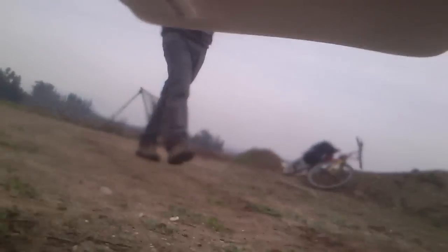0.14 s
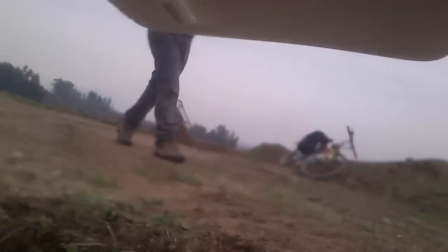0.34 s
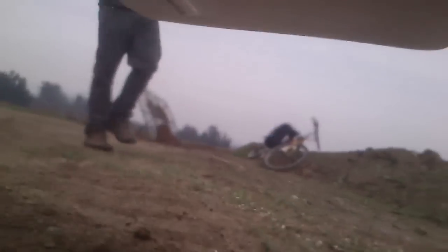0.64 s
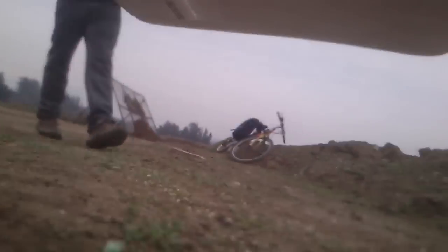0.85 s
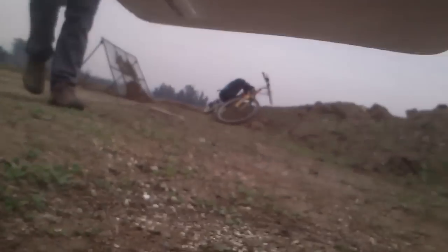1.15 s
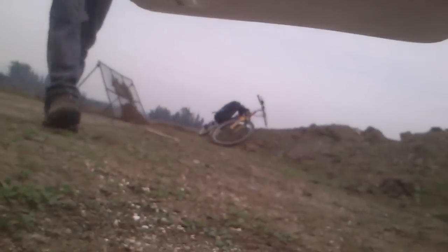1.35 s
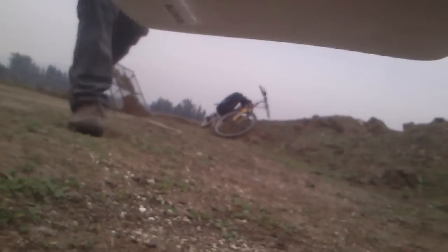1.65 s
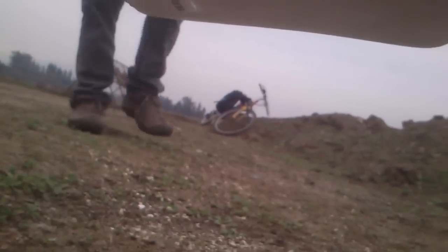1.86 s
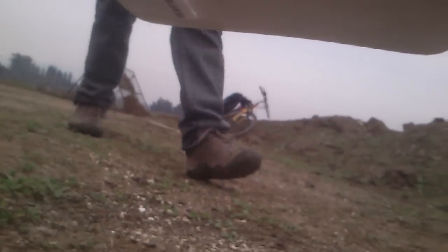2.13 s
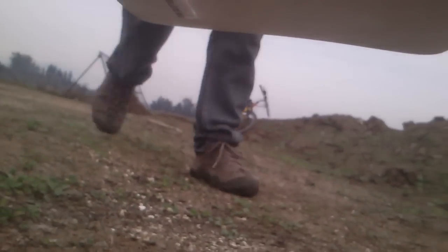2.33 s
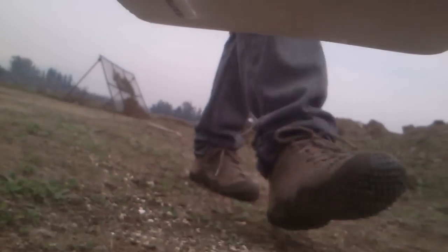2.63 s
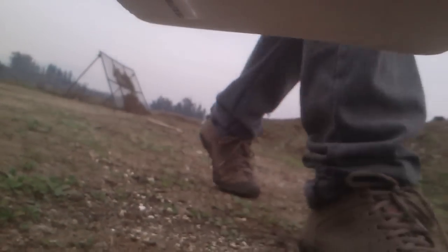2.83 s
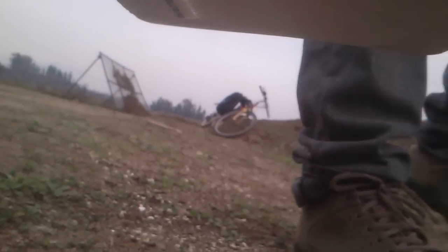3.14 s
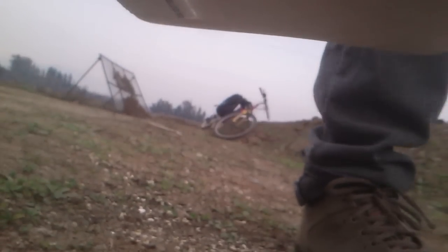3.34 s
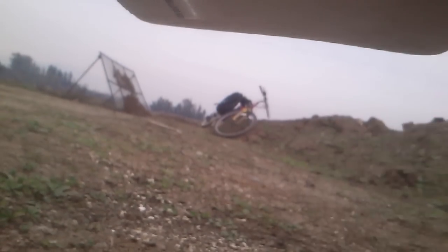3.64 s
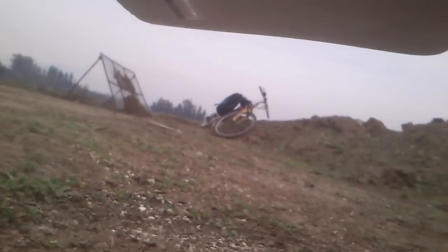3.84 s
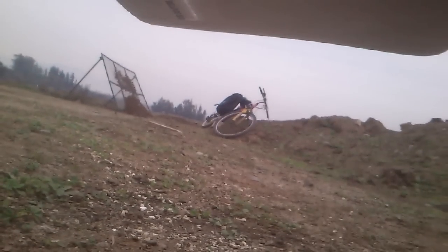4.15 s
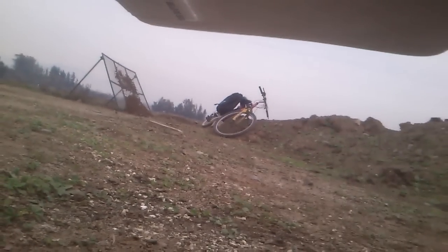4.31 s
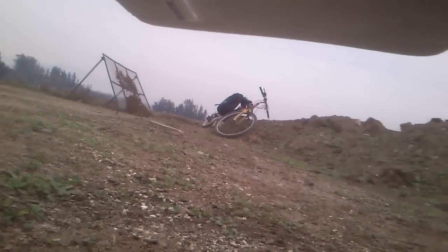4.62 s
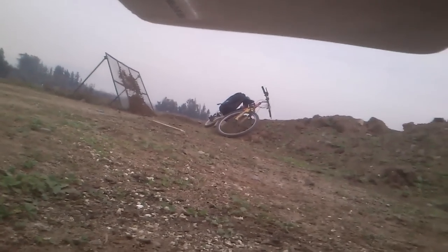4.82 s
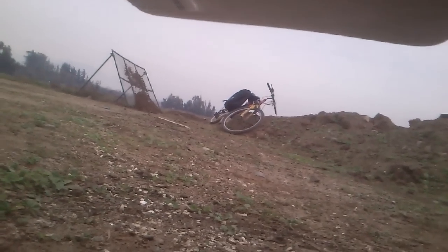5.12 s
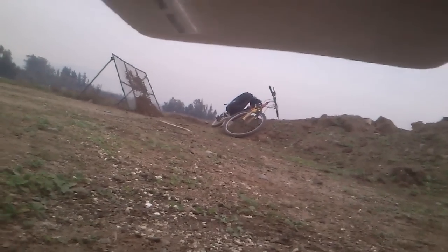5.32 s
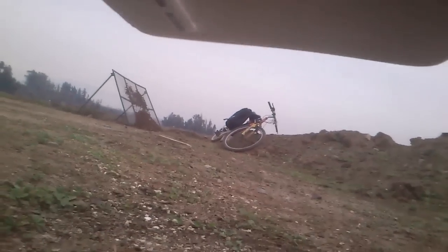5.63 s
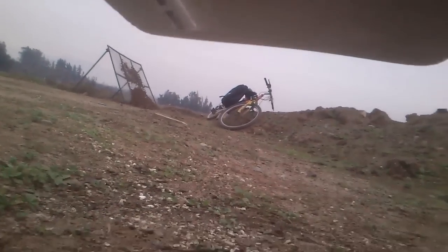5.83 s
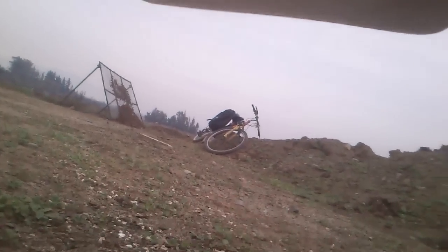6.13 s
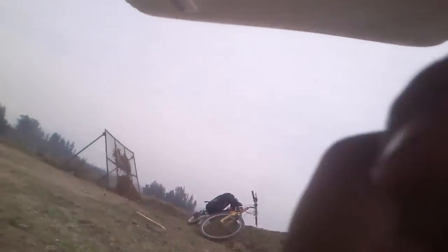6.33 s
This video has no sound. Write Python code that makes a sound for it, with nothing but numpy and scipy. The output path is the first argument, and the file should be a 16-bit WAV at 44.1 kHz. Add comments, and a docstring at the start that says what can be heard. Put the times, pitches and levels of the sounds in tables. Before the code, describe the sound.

A foam model plane scrapes and crunches to a stop on gritty ground, then faint footsteps approach and a hand knocks and rubs its body.

```python
"""A foam model glider slides to rest on a gritty hillside, heard from close under its wing.
First the belly scrapes, jolts and crunches over stones and sand (random hits through filters), while a
rough propeller whirr falls and fades. The mount then ticks and the foam skin crackles as it all settles.
Boots press and scuff the dirt (noise and tiny stone rings), then a hand knocks and rubs the foam.
A wavering low drone (sine waves), low air noise and a soft hiss lie underneath throughout."""
import sys
import numpy as np
from scipy.fft import rfft, irfft, next_fast_len
from scipy.io import wavfile
from scipy.ndimage import map_coordinates

SR = 44100
rng = np.random.default_rng(int(sys.argv[2]) if len(sys.argv) > 2 else 0)


def pcm_store(signal):
    """Save signal as 16-bit PCM."""
    levels = np.round(np.clip(np.atleast_2d(signal), -1, 1) * 32767)
    wavfile.write(sys.argv[1], SR, levels.astype(np.int16).T)


N = 285327


def amp(db):
    """Turn decibels into a gain."""
    return 10 ** (np.asarray(db) / 20)


def unit(x):
    """Scale x to an average (rms) strength of 1."""
    return x / np.sqrt(np.mean(x ** 2) + 1e-20)


def curves(rows, **ends):
    """Draw straight lines between the rows: one value per sample for each column after the time."""
    s, *cols = np.transpose(rows)
    return [np.interp(np.arange(N) / SR, s, c, **ends) for c in cols]


def wobble(rate):
    """A smooth random curve through rate random points a second."""
    points = rng.standard_normal(int(N * rate / SR) + 4)
    return map_coordinates(points, [np.arange(N) * rate / SR])


def add(track, s, sound):
    """Mix a sound into a track at time s."""
    part = track[max(round(s * SR), 0):][:len(sound)]
    part += sound[:len(part)]


def fade(t, t60):
    """Dying away: 60 dB weaker after t60 seconds."""
    return np.exp(-np.log(1000) * t / t60)


def coloured(x, spectrum, modes=(), tilt=0):
    """Filter x with a broad colour, resonances on top, and a tilt in dB per octave."""
    size = 2 * next_fast_len(len(x) // 2 + SR // 32, real=True)
    hz = np.fft.rfftfreq(size, 1 / SR) + 1
    f, level = np.transpose(spectrum)
    db = np.interp(np.log(hz), np.log(f), level)
    db = db + tilt * np.log2(np.clip(hz, 200, 6500) / 1000)
    for centre, width, lift in modes:
        db = db + lift / (1 + (2 * (hz - centre) / width) ** 2)
    # folding the cepstrum makes the filter ring only after each hit, never before it
    cepstrum = irfft(np.log(amp(db)))
    cepstrum[1:size // 2] *= 2
    cepstrum[size // 2 + 1:] = 0
    return irfft(rfft(x, size) * np.exp(rfft(cepstrum)))[:len(x)]


def grains(rate, spread_db):
    """Tiny random contacts of uneven size, about rate a second, at rms 1."""
    size = amp(spread_db * np.clip(rng.standard_normal(N), -2, 2))
    hits = rng.random(N) < rate / SR
    return unit(hits * size * np.sign(rng.standard_normal(N)))


def pebbles(start, end, rate, t60, spread_db):
    """Stones strike at random moments, each with a brief ring at its own pitch; rms 1."""
    when, pitch, size = rng.random((round(rate * (end - start)), 3)).T[:, :, None]
    t = np.arange(SR // 160) / SR
    rings = amp(spread_db * size ** 2) * np.sin(2 * np.pi * pitch * SR / 4 * t) * fade(t, t60)
    at = ((start + when * (end - start)) * SR).astype(int) + np.arange(len(t))
    return unit(np.bincount(at.ravel(), rings.ravel(), N)[:N])


def scatter(start, end, level_db, rate, spread_db, tilt, tilt_spread):
    """Small contacts at uneven moments, rate a second, sized by a level curve: rows (s, dB, tilt)."""
    chance = rng.random((200, 3))  # at most 200 contacts
    times = start + (np.arange(len(chance)) + chance[:, 0]) / rate
    rows = []
    for s, (_, size, colour) in zip(times, chance):
        if s < min(end, (N - 1) / SR):
            db = level_db[int(s * SR)] + spread_db * (2 * size - 1)
            rows.append((s, db, tilt + tilt_spread * (2 * colour - 1)))
    return rows


SPOT_WIDTH_HZ, SPOT_LIFT_DB = 275, 8.5  # the resonance of the spot that a contact meets


def blows(rows, spectrum, modes, t60, chatter):
    """Each contact is a push and a dying chatter; it rings the body and one spot (random if unnamed)."""
    track, t = np.zeros(N), np.arange(SR // 12) / SR
    for s, db, tilt, *note in rows:
        force = chatter * rng.standard_normal(len(t)) * fade(t, t60)
        force[0] = 1
        spot_hz = note[0] if note else 2900 * np.exp(.25 * rng.standard_normal())
        ring = coloured(force, spectrum, [*modes, (spot_hz, SPOT_WIDTH_HZ, SPOT_LIFT_DB)], tilt)
        add(track, s, amp(db) * ring / np.abs(ring).max())
    return track


def friction(contacts, s, size, grit):
    """The force of a stroke from time s: a smooth swish mixed with a share of separate contacts."""
    rough, share = unit(contacts[round(s * SR):][:size]), np.clip(grit, 0, 1)
    return np.sqrt(share) * rough + np.sqrt(1 - share) * rng.standard_normal(len(rough))


# how hard the belly drags, until it stops: time_s, level_db
DRAG = [(0, -13.5), (.18, -19), (.34, -15.5), (.42, -19.5), (.8, -23.5), (1.0, -23.5), (1.21, -35.5),
        (1.31, -45.5), (1.44, -52)]
DRAG_REF_DB = -20  # the drag level that counts as an effort of 0 dB


def drag_level():
    """The belly's drag in dB at every sample, silent once it has stopped."""
    return curves(DRAG, right=-140)[0]


# resonances of the body and of its shell: pitch_hz, width_hz, lift_db
AIRFRAME = [(74.6, 16, 16), (146.9, 19, 9), (181.2, 11, 11.5), (277.4, 42, 10), (890, 48, 3.5),
            (1387, 84, 3), (2020, 54, 10), (2480, 220, 5.5)]
SHELL = [(874, 90, 4), (1300, 140, 3), (1800, 120, 3), (2790, 260, 5), (3290, 260, 7), (4000, 300, 4),
         (4690, 200, 4), (5100, 250, 5)]
# colours of the low shudder, the scrape and the crunching gravel: pitch_hz, level_db
RUMBLE = [(15, -31), (30, 2), (45, -1), (75, -6.5), (112, -6.5), (160, -4.5), (215, -10), (320, -30),
          (600, -81.5)]
SCRAPE = [(120, -64.5), (220, -7), (280, -4.5), (380, 1), (600, -2), (900, -2.5), (1200, -9.5), (1800, -14),
          (4000, -39), (9000, -97)]
CRUNCH = [(300, -20), (800, 0.5), (1500, -5), (2500, 2), (3400, -4.5), (4000, -4.5), (5000, -13.5),
          (5500, -12.5), (7200, -12), (8300, -22), (10000, -64), (16000, -91.5)]
RUMBLE_DB, RUMBLE_GROWS = -23.5, 0.68  # level at zero effort, and dB gained per dB of effort
CRUNCH_DB, CRUNCH_GROWS = -36.5, 1.33  # the same for the gravel
BUMPS_DB, BUMPS_HZ = 1.94, 28.2  # how far the belly rocks, and random points a second


def slide():
    """The belly drags over grit: the wings shudder, the shell roars and gravel crunches."""
    drag_db = drag_level()
    effort_db = drag_db - DRAG_REF_DB
    clumps = np.tanh(wobble(110.34))  # the ground comes in lumps
    bumps_db = BUMPS_DB * np.tanh(1.8 * wobble(BUMPS_HZ))

    shudder = unit(coloured(grains(900, spread_db=3.0), RUMBLE, AIRFRAME))
    rumble = amp(RUMBLE_DB + RUMBLE_GROWS * effort_db + bumps_db) * shudder

    grit = grains(1600, spread_db=2) * amp(2 * clumps)
    scrape = amp(drag_db - 1.0 + bumps_db) * unit(coloured(grit, SCRAPE, AIRFRAME))

    gravel = pebbles(0, DRAG[-1][0], rate=2400, t60=0.005, spread_db=11) * amp(3 * clumps)
    crunch = unit(coloured(gravel, CRUNCH, SHELL))
    crunch = amp(CRUNCH_DB + CRUNCH_GROWS * effort_db + bumps_db) * crunch
    return rumble + scrape + crunch


# the belly jolts over humps and the hull booms briefly: start_s, level_db, pitch_hz
JOLTS = [(.008, -14.5, 660), (0.109, -14, 810), (.21, -12, 846), (.313, -13.5, 304), (.372, -18.5, 860),
         (.412, -18.5, 427), (0.471, -28, 453), (.519, -16, 515), (0.554, -25, 900), (.58, -19.5, 396),
         (.68, -16.5, 760), (0.727, -19.5, 480), (.765, -34, 520), (.82, -25, 466), (.846, -21.5, 910),
         (.877, -23, 700), (0.912, -23, 350), (.942, -23, 547), (.98, -23.5, 600), (1.049, -39, 417),
         (1.09, -21.5, 435), (1.19, -31.5, 730)]
JOLT_S, JOLT_WIDTH_HZ, JOLT_LIFT_DB = 0.041, 330, 12.5


def jolts():
    """Each hump presses the belly harder for a moment and brings out one region of the hull's ring."""
    track, press = np.zeros(N), np.hanning(round(JOLT_S * SR))
    for s, db, hz in JOLTS:
        noise = rng.standard_normal(len(press))
        force = np.pad(press * noise, (0, SR // 20))  # room for the ring to die away
        boom = coloured(force, SCRAPE, [*AIRFRAME, (hz, JOLT_WIDTH_HZ, JOLT_LIFT_DB)])
        add(track, s, amp(db) * boom * np.linalg.norm(press) / np.linalg.norm(boom))
    return track


# larger stones under the belly, relative levels: start_s, level_db, tilt_db_per_octave
STONES = [(.011, -11, -3), (.029, -23.5, 4), (.044, -10.5, -10), (.096, -6, -4.5), (.1202, -2.5, -1.5),
          (.156, -6.5, -1), (.171, -15, 4), (.2205, -10.5, 11), (.2285, -12.5, 2), (.2344, -6.5, 1),
          (.249, -4, 1), (.263, -11, 5), (.308, -12, 2), (.326, -25, 8), (.339, -17, 7), (.359, -12, 13.5),
          (.368, -6.5, 3.5), (.434, -13, 3), (.448, -13, 4), (.462, -17, 6), (.5335, -6, 3),
          (.546, -10.5, -2), (.552, -12, 10), (.582, -16, 5), (.599, -14, 9), (.610, -15, -3),
          (.636, -10, -0.5), (.665, -32, 4), (.683, -8, -8), (.7002, -7, -3.5), (.7124, -6, 0.5),
          (.7338, -7, 0), (.752, -16, -5), (.787, -12, -0.5), (.822, -22, 11), (.864, -6.5, 2),
          (.872, -10.5, 5), (.8935, -5, 0.5), (.903, -12.5, 2), (.9132, -8, -0.5), (.929, -12.5, -0.5),
          (.941, -15, 1), (.948, -13, 0), (.979, -10, -2.5), (.985, -4, 0), (.993, -7, 1.5),
          (1.002, -4.5, 0), (1.009, -16, -2), (1.026, -9.5, 2), (1.047, -33, -3), (1.061, -17, -4),
          (1.0895, -17, 3), (1.098, -10, 1), (1.104, -9.5, 0), (1.115, -18, 0), (1.123, -12, -0.5),
          (1.1352, -15, -1), (1.157, -20.5, -2.5), (1.1893, -21, 4), (1.205, -26, -7), (1.218, -28, -12),
          (1.232, -33, -6), (1.2522, -24, 0), (1.265, -30, -3), (1.298, -29.5, 0)]
# colour of a hard little contact: pitch_hz, level_db
STONE = [(300, -17), (800, 7), (1500, 0.5), (2600, 2), (3400, -2), (4000, -4), (5100, -8.5), (5800, -14),
         (7200, -18), (8300, -25.5), (10000, -66.5), (16000, -89.5)]


def stones():
    """Larger stones hit the shell one by one, each a push with a long chatter."""
    return amp(-2.5) * blows(STONES, STONE, SHELL, t60=0.036, chatter=0.49)


# the loudest sand pings off the shell, relative levels: start_s, level_db
PINGS = [(0.023, -26), (.034, -18), (.049, -19), (.061, -25), (.0705, -25), (.087, -23), (.095, -11),
         (.1148, -14.5), (.123, -19), (.193, -18), (.212, -18), (.29, -23), (0.299, -22), (.323, -23),
         (0.343, -13), (.35, -25), (0.39, -19.5), (.411, -30), (0.435, -15.5), (.443, -26), (.463, -20.5),
         (.58, -17), (0.591, -20), (.701, -19)]
# colour of a sand ping: pitch_hz, level_db
GRIT = [(2000, -45), (4800, -16), (6200, -2.5), (7000, -5), (8300, -20), (10000, -55), (16000, -88)]
SAND_DB = -34.5  # middle of the small grains' relative levels at zero effort


def sand():
    """Sand grains ping off the shell in very short, high clicks; the small ones follow the drag."""
    level_db = SAND_DB + 1.2 * (drag_level() - DRAG_REF_DB)
    small = scatter(0, DRAG[-1][0], level_db, rate=22, spread_db=6.5, tilt=0.83, tilt_spread=4.8)
    loud = [(s, db, 0) for s, db in PINGS]
    return amp(2.0) * blows(loud + small, GRIT, (), t60=0.0017, chatter=0.041)


WHIRR_START_HZ, WHIRR_HALF_S = 737.4, .21  # first pitch, and the time to half of it
WHIRR_DB, WHIRR_HOLD_S, WHIRR_RELEASE_DB_PER_S = -22.5, 0.26, 123
WHIRR_ROUGHNESS = 120  # random points a second that blur the note


def whirr():
    """Air drag slows the propeller, fast at first; its rough note sinks into the scraping."""
    t = np.arange(N) / SR
    phase = 2 * np.pi * np.cumsum(WHIRR_START_HZ / (1 + t / WHIRR_HALF_S)) / SR
    note = wobble(WHIRR_ROUGHNESS) * np.cos(phase) + wobble(WHIRR_ROUGHNESS) * np.sin(phase)
    level_db = WHIRR_DB - WHIRR_RELEASE_DB_PER_S * np.maximum(t - WHIRR_HOLD_S, 0)
    return amp(level_db) * unit(note)


# knocks on the wing, relative levels: start_s, level_db, tilt_db_per_octave, struck_spot_hz
KNOCKS = [(4.6395, -13, -1, 1280), (4.692, -13, 3, 880), (4.7125, -21, -4.5, 1300), (4.715, -5, -3, 1340),
          (4.7212, 2, 2.5, 2640), (4.7235, -0.5, -2, 780), (5.3978, -10, 1.5, 1820),
          (5.477, -7.5, -2.5, 980), (5.501, -11, -6, 1000), (5.526, -12, 2.5, 1970), (5.7226, 5.5, 0, 1026),
          (5.7258, -0.5, 1.5, 716), (5.793, -7.5, 1, 1390), (5.822, -26, 7, 1300), (5.8513, -18.5, 0, 1150),
          (5.885, -22, 6, 1120), (5.890, -18.5, -3, 1120)]
# colour of a knock: pitch_hz, level_db
KNOCK = [(80, -11.5), (250, -3.5), (500, 3.5), (900, 4.5), (1300, 3.5), (1750, -3), (2600, -8),
         (4000, -10.5), (5200, -22), (7500, -26.5), (9000, -43), (14000, -55)]
# resonances of the wing: pitch_hz, width_hz, lift_db
WING = [(274, 50, 5), (492, 90, 6), (760, 140, 5), (1340, 150, 5), (2050, 200, 4), (2570, 300, 5),
        (3400, 250, 3), (3930, 350, 7), (5000, 400, 4)]


def knocks():
    """Dry knocks ring the wing and the spot that is struck."""
    return amp(0.5) * blows(KNOCKS, KNOCK, WING, t60=0.018, chatter=0.2)


# soft blows that flex the fuselage: start_s, level_db (before the soft start), pitch_hz, t60_s
THUMPS = [(0.019, -9.5, 76, 0.15), (0.477, -17.5, 74, 0.24), (0.576, -17.5, 73, 0.18),
          (0.586, -12.5, 151, 0.16), (0.935, -22, 73.4, 0.19), (1.235, -29.5, 147, 0.12),
          (4.182, -33, 418, 0.084), (4.724, -17, 201, .04), (4.724, -13, 490, 0.033),
          (4.751, -5, 282, 0.082), (4.754, -23, 136, 0.38), (5.465, -6, 62.4, 0.082),
          (5.467, -2, 160.5, 0.06), (5.475, -15, 136, 0.18), (5.499, -1, 56.7, 0.048),
          (5.526, -15, 160, 0.21), (5.723, -9, 346, .04), (5.732, -14.5, 485, 0.11)]


def thumps():
    """A soft blow bends the fuselage, which swings back and forth as a dying sine."""
    track, t = np.zeros(N), np.arange(SR // 4) / SR
    soft_start = 1 - np.exp(-t / 0.003)
    for s, db, hz, t60 in THUMPS:
        swing = np.sin(2 * np.pi * hz * t) * fade(t, t60)
        add(track, s, amp(db) * swing * soft_start)
    return track


# fingers rubbing the foam, relative levels:
# start_s, length_s, level_db, tilt_db_per_octave, strongest_note_hz, grit (0 smooth to 1 gritty)
RUBS = [(4.618, 0.049, -35.5, -3, 750, 0.56), (4.657, 0.18, -35, -0.5, 800, 0.8),
        (4.725, 0.068, -20.5, -.5, 756, 0.7), (4.865, 0.15, -37, 0, 497, 0.97),
        (5.096, 0.078, -35, 0.5, 1990, 0.5), (5.142, 0.13, -42, -1, 550, 0.4),
        (5.364, 0.089, -41, -1, 800, 0.9), (5.429, .09, -21.5, -1.5, 400, 0.77),
        (5.472, 0.079, -19.5, 1, 503, 0.9), (5.512, 0.081, -18, 1, 1040, 0.72),
        (5.561, 0.21, -29.5, -2, 504, .4), (5.733, .06, -27.5, -1, 450, 0),
        (5.77, .045, -22.5, 0.5, 1100, 0.6), (5.8, .15, -33, 1, 1350, 0.3),
        (6.302, 0.98, -46, 2.5, 815, 0.2)]
# colour of rubbed foam: pitch_hz, level_db
RUB = [(25, -16), (70, 4.5), (110, -0.5), (220, 2.5), (480, 7.5), (680, 2.5), (1000, 0), (1600, -3),
       (2600, -12), (4000, -17.5), (7200, -28.5), (9000, -67), (15000, -69.5)]
RUB_WIDTH_HZ, RUB_LIFT_DB = 500, 2.5  # the strongest region of a rub


def fingers():
    """Skin sticks and slips on foam; each stroke grips fast and eases off, with small crackles under it."""
    track, grip = np.zeros(N), np.zeros(N)
    slips = grains(1400, spread_db=2.5) * amp(4 * np.tanh(wobble(140)))
    for s, length, db, tilt, hz, grit in RUBS:
        force = friction(slips, s, round(length * SR), grit)
        stroke = unit(coloured(force, RUB, [*AIRFRAME, (hz, RUB_WIDTH_HZ, RUB_LIFT_DB)], tilt))
        progress = np.arange(len(stroke)) / (length * SR)
        pressure = amp(db + 1.5) * np.sin(np.pi * np.sqrt(progress))
        add(track, s, pressure * stroke)
        add(grip, s, pressure)
    grip_db = 20 * np.log10(np.abs(grip) + amp(-52))  # the floor keeps faint crackles between strokes
    small_crackles = scatter(RUBS[0][0], N / SR, 0.7 * grip_db - 7.5,
                             rate=30, spread_db=2.5, tilt=-.9, tilt_spread=3.3)
    return track + blows(small_crackles, STONE, SHELL, t60=0.016, chatter=0.15)


# the louder crackles of the foam skin, relative levels: start_s, level_db, tilt_db_per_octave
CRACKLES = [(1.383, -29.5, 0.5), (1.472, -30, -8), (1.496, -22.5, -2.5), (1.517, -31.5, -2.5),
            (1.536, -34.5, -5), (1.636, -28.5, -9), (4.7428, -4.5, -3.5), (4.760, -11, -1),
            (4.776, -22, -3), (4.871, -25, -8), (4.882, -36, -10), (4.9005, -21, 5), (4.947, -30, 8),
            (4.973, -24, -18), (4.995, -29, -6), (5.172, -19, -7), (5.205, -26, -7.5), (5.223, -24.5, -17),
            (5.2766, -26, -7), (5.287, -28.5, -7.5), (5.3225, -26.5, -7), (5.383, -36, 1),
            (5.4315, -19.5, 1), (5.444, -24, 3), (5.452, -19.5, 14), (5.459, -18.5, 17), (5.507, -15, -12),
            (5.543, -16, -2), (5.552, -25, 4), (5.558, -31, 3), (5.568, -10, 1.5), (5.605, -21, 8),
            (5.613, -22, 1), (5.632, -20, -3), (5.650, -11.5, -1), (5.684, -12, -0.5), (5.698, -16, -3),
            (5.754, -16, -3), (5.784, -10.5, -3), (5.903, -23, 8), (5.918, -38, 5), (5.936, -20, -15),
            (5.992, -20, -1), (6.0115, -15.5, -5.5), (6.034, -27, -6), (6.043, -24, -7), (6.0523, -12, -4),
            (6.060, -31, -11), (6.1087, -26, -6), (6.317, -36, 4), (6.430, -19.5, -10)]


def crackles():
    """The foam skin crackles: sharp pushes with a faint chatter, ringing the shell."""
    return amp(-2) * blows(CRACKLES, STONE, SHELL, t60=0.039, chatter=0.093)


# slips of the mount, relative levels: start_s, level_db, tilt_db_per_octave, hollow_note_lift_db
TICKS = [(1.323, -21, 4.5, 2), (1.3352, -18.5, 2.5, 7), (1.4576, -18.5, 0.5, 3.5), (1.6998, -29, -3, 12),
         (1.7549, -33, -4.5, 14), (4.8516, -17, 1.5, 12), (5.024, -15.5, -0.5, 7.5), (5.1388, -11.5, 2, 12),
         (5.1912, -24.5, 1.5, 13), (5.6203, -6, 2, 12), (5.964, -8.5, 2, 9), (6.1708, -12, 1, 9.5)]
# colour of a tick: pitch_hz, level_db
TICK = [(100, -48), (230, -3.5), (330, 3.5), (650, 5), (830, -12), (1200, -3), (1900, -4), (2800, -15),
        (3600, -17), (4300, -25), (6500, -34.5), (8300, -41), (10500, -62), (16000, -96)]
# the mount's resonances before each slip shifts them: pitch_hz, width_hz, lift_db
MOUNT = [(330, 110, 3), (520, 120, 3), (1620, 200, 4), (2510, 340, 4), (3300, 500, 4)]
# its longest resonance, which stays put: pitch_hz, width_hz, lift_db
MOUNT_RING = (295, 19, 8.5)
MOUNT_SPOT_HZ = 2720  # the note of the spot where the mount slips
HOLLOW_HZ, HOLLOW_WIDTH_HZ = 717, 250  # the hollow note, also shifted by each slip
SLIP_DETUNE = 0.015  # typical shift, as a share of the pitch


def mount():
    """Every slip catches the mount in a new position, so each dry tick rings a little differently."""
    track = np.zeros(N)
    for s, db, tilt, hollow_db in TICKS:
        modes = [MOUNT_RING]
        for hz, width, lift in [*MOUNT, (HOLLOW_HZ, HOLLOW_WIDTH_HZ, hollow_db)]:
            modes.append((hz * (1 + SLIP_DETUNE * rng.standard_normal()), width, lift))
        track += blows([(s, db, tilt, MOUNT_SPOT_HZ)], TICK, modes, t60=0.031, chatter=0.069)
    return amp(2) * track


# soles pressing or scuffing the dirt, levels before the press and release:
# start_s, length_s, level_db, tilt_db_per_octave, strongest_note_hz, grit (0 smooth to 1 gritty)
STEPS = [(2.194, 0.088, -48.5, -1, 1990, 0.54), (2.315, .015, -59, -4.5, 1800, .7),
         (2.528, 0.026, -50, -4, 1700, .7), (2.791, 0.057, -44, 2, 1150, 0.4),
         (2.856, 0.014, -43, -1.5, 1140, 0.7), (2.898, 0.027, -59, 6, 1200, 0.6),
         (3.026, 0.037, -54.5, 2, 1300, 0.5), (3.412, 0.26, -54.5, 5, 1000, 0.4),
         (3.545, 0.056, -34, 1, 960, 0.22), (3.609, 0.017, -33.5, 0, 900, 0.4),
         (3.656, .022, -42.5, -0.5, 1000, 0.4), (3.716, 0.028, -31.5, -1.5, 800, 0.34),
         (3.789, 0.13, -47.5, 1, 900, 0.24), (3.904, 0.062, -44, 1.5, 885, 0.56),
         (3.98, 0.046, -55, 7.5, 1000, .6), (4.104, 0.016, -52, 5, 1400, 0.6),
         (4.439, .065, -39, -2.5, 750, 0.2)]
# heels landing and stones popping, relative levels: start_s, level_db, tilt_db_per_octave, note_hz
GRAVEL = [(2.2, -29, -1, 2100), (2.253, -31, -5, 400), (2.267, -33, -1, 2300), (2.324, -38, 0, 2000),
          (2.3597, -36, -1, 1890), (2.6141, -33, -2.5, 1780), (2.718, -42, 3, 2200), (2.763, -43, 5, 2500),
          (2.8017, -29, 1.5, 1300), (2.860, -19, 0, 1140), (2.869, -22.5, -3, 544), (2.875, -29, 1, 1190),
          (2.915, -31, 1.5, 1150), (3.302, -39, 2, 1300), (3.529, -29.5, 0, 1200), (3.620, -25, 4, 900),
          (3.661, -28, -9, 1100), (3.742, -17, -0.5, 950), (3.754, -17, -3, 1100), (3.854, -29, -7, 1300),
          (3.883, -25, -3, 900), (3.928, -35, 0.5, 1400), (4.038, -39, 2, 1300), (4.129, -31.5, 1, 1410),
          (4.1497, -29, 2.5, 950), (4.244, -37.5, -1.5, 1300), (4.504, -25.5, -1, 1300),
          (4.581, -32, -1, 1300)]
# colour of trodden dirt: pitch_hz, level_db
DIRT = [(100, -12.5), (200, -6), (420, -2), (650, -2.5), (1100, -4), (1500, -3.5), (2500, -11), (4700, -24),
        (6100, -37.5), (8800, -39), (11000, -68), (16000, -81)]
STEP_ATTACK_S, STEP_RELEASE_DB_PER_S = 0.0097, 159
STEP_WIDTH_HZ, STEP_LIFT_DB = 340, 6  # the strongest region of a scuff


def boots():
    """Each sole takes the weight quickly, grinds the fine dirt and lets go; stones pop under it."""
    track, t = np.zeros(N), np.arange(SR // 2) / SR
    crumbs = pebbles(2, 5, rate=2600, t60=.004, spread_db=12) * amp(1.6 * wobble(110))
    for s, length, db, tilt, hz, grit in STEPS:
        release_db = STEP_RELEASE_DB_PER_S * np.maximum(t - length, 0)
        weight = amp(db - release_db) * (1 - np.exp(-t / STEP_ATTACK_S))
        force = friction(crumbs, s, len(t), grit)
        scuff = coloured(force, DIRT, [(hz, STEP_WIDTH_HZ, STEP_LIFT_DB)], tilt)
        add(track, s, weight * unit(scuff))
    return track + amp(-3.0) * blows(GRAVEL, DIRT, (), t60=0.029, chatter=0.77)


# the drone's slow drift, before a slight random waver: time_s, pitch_hz, overtone_level_db
DRONE = [(1.5, 63, 0), (2.1, 60, -1), (2.7, 58.2, 0), (3.3, 58.5, 0), (3.8, 61.5, 0), (4.15, 62, 4),
         (4.5, 63, 4), (5.2, 62, 2), (6.47, 63, 1)]
# its partials: multiple of the pitch, level_db (relative)
DRONE_ORDERS = [(1, 0.5), (1.5, -12), (2, -8.5), (2.5, -13), (3, -12)]
DRONE_DB = -42  # the level that the partials are relative to


def drone():
    """A wavering drone, like a far engine: sine partials that drift in pitch and level."""
    pitch_hz, overtones_db = curves(DRONE)
    phase = 2 * np.pi * np.cumsum(pitch_hz * (1 + .004 * wobble(9))) / SR
    track = np.zeros(N)
    for multiple, db in DRONE_ORDERS:
        level_db = DRONE_DB + db + 1.5 * wobble(5.0)
        if multiple > 1:
            level_db = level_db + overtones_db
        track += amp(level_db) * np.sin(multiple * phase)
    return track


# level of the low air noise: time_s, level_db
LOW_AIR_LEVEL = [(1.5, -44), (3.3, -44.5), (4.9, -42.5), (5.3, -41.5), (5.7, -37), (6.1, -42.5)]
# its colour: pitch_hz, level_db
LOW_AIR = [(12, -5), (26, -5.5), (38, 5.5), (52, 4.5), (80, 3), (110, -7), (180, -7), (300, -11),
           (500, -20), (1200, -44.5), (4000, -93)]


def low_air():
    """Low air noise: random noise with its weight in the bass."""
    return amp(curves(LOW_AIR_LEVEL)[0]) * unit(coloured(rng.standard_normal(N), LOW_AIR))


# level of the soft hiss, uneven and stronger from about 4.3 s: time_s, level_db
HISS_LEVEL = [(1.5, -59.5), (2.7, -58.5), (3.4, -57), (4.1, -59), (4.35, -53.5), (5.1, -54), (6.2, -55.5)]
# its colour: pitch_hz, level_db
HISS = [(150, -16), (300, -9.5), (500, -0.5), (1000, -1.5), (2000, -8.5), (4000, -16.5), (8500, -22),
        (10000, -42), (16000, -80)]
FINE_HISS_DB = -70.5


def hiss():
    """A soft coloured hiss over a steady, very faint white one."""
    soft = amp(curves(HISS_LEVEL)[0]) * unit(coloured(rng.standard_normal(N), HISS))
    return soft + amp(FINE_HISS_DB) * rng.standard_normal(N)


# how much left and right differ at each pitch: pitch_hz, side_level_db
WIDTH = [(500, -80), (1000, -60.5), (2000, -50), (4000, -37.5), (8000, -15.5), (16000, -15.5)]


def scene():
    """Nearly mono: mostly the treble flickers a little between left and right."""
    mid = slide() + jolts() + stones() + sand() + whirr()
    mid += knocks() + thumps() + fingers() + crackles() + mount() + boots()
    mid += drone() + low_air() + hiss()
    side = coloured(mid * wobble(300), WIDTH)
    return np.array([mid + side, mid - side])


TOP_HZ = 15800  # nothing is kept from this pitch up


def record(dry):
    """Peaks beyond full scale are cut flat, then the highest treble is removed."""
    clipped = np.clip(dry, -1, 1)
    size = next_fast_len(N + SR // 2)
    keep = np.fft.rfftfreq(size, 1 / SR) < TOP_HZ
    return irfft(rfft(clipped, size) * keep, size)[:, :N]


dry = scene()
out = record(dry)
pcm_store(out)
```